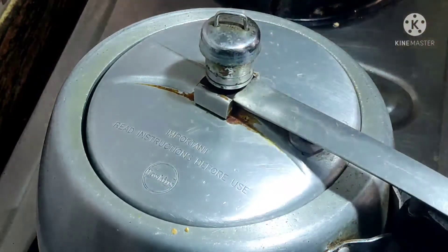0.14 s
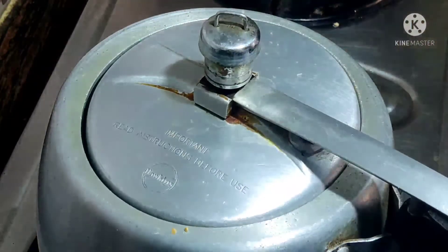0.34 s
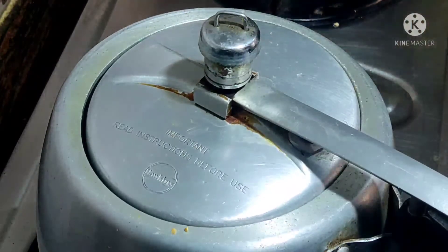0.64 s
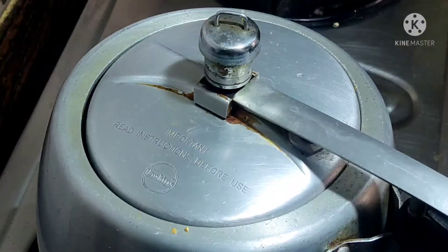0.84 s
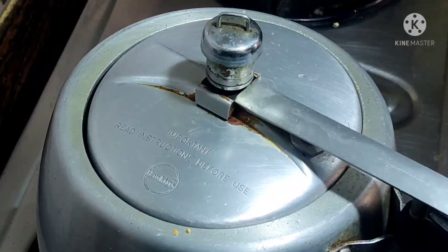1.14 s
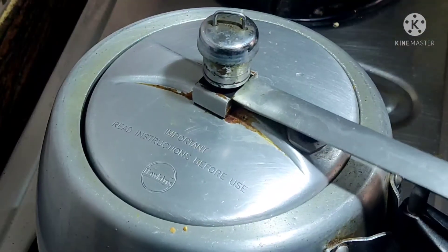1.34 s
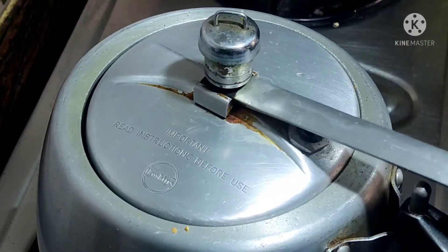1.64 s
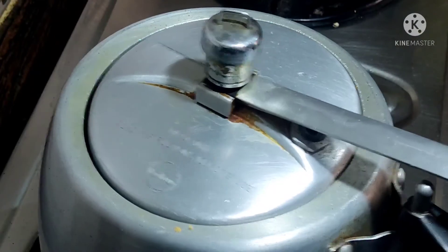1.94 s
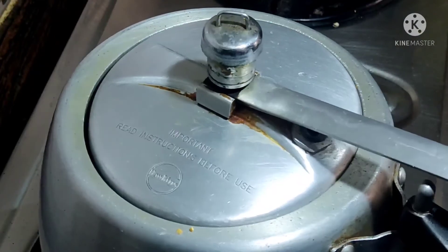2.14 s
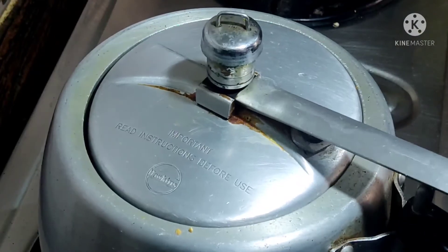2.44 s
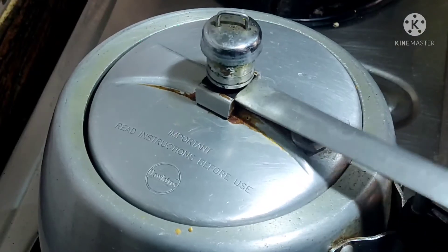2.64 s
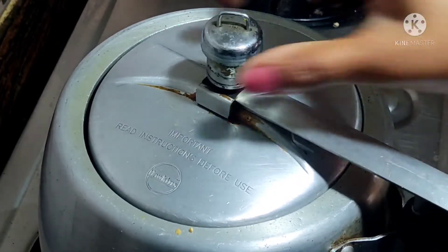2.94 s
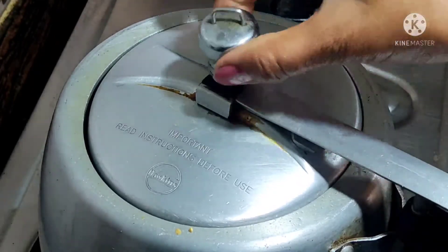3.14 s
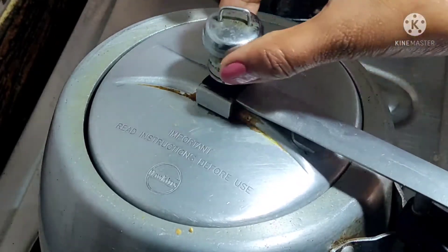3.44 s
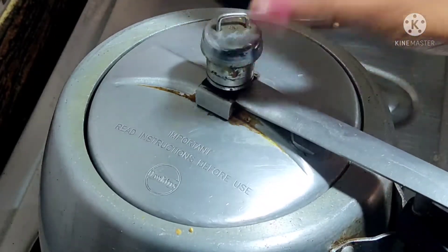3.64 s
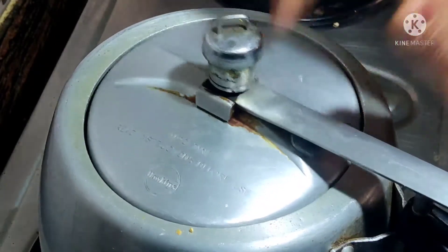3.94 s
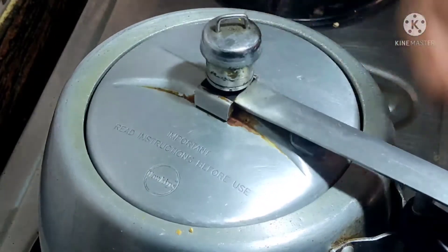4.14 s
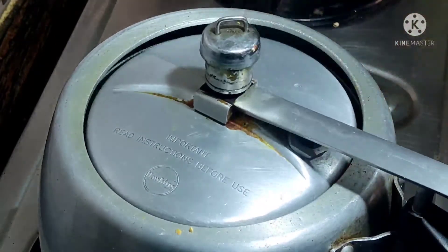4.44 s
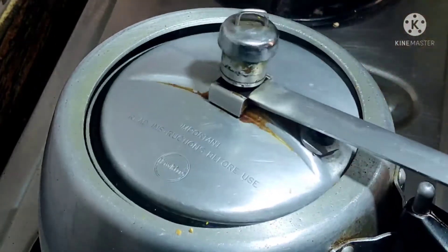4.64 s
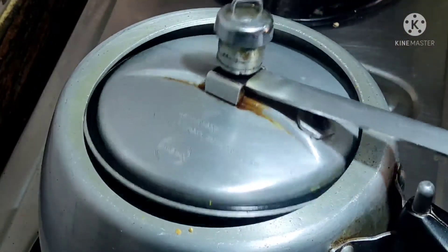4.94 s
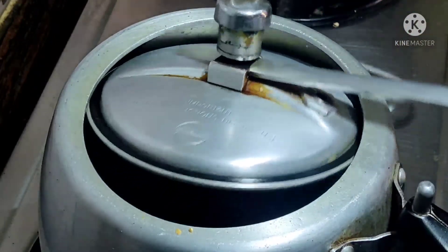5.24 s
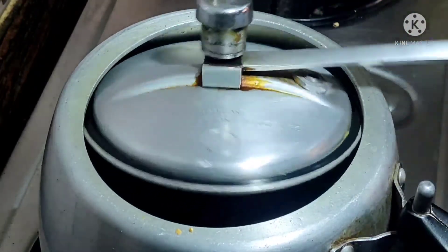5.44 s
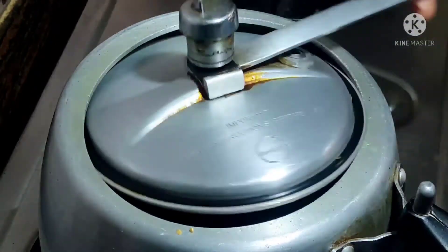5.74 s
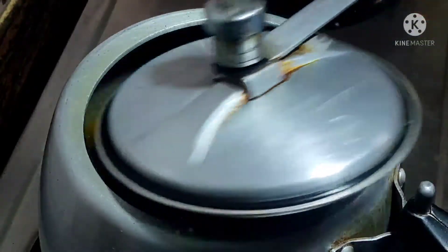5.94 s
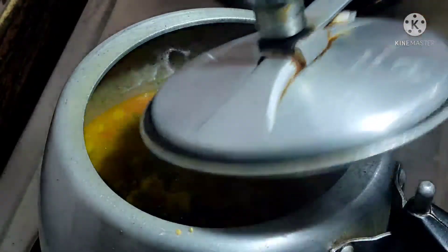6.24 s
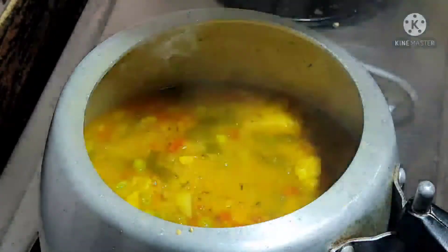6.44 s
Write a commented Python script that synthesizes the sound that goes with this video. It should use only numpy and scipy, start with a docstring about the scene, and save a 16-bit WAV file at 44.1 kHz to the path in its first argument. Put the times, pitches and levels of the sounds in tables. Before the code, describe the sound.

Close, wide stereo in a small reverberant kitchen, with soft low background and faint unsteady hum. From 0.3 to 1.0 s, aluminium cooker handles give irregular knocks, some clicky, some dull, with a faint creak. A wet plip and very faint seep of steam come near 1.2 s; quicker knocks with a high wire ping follow from 1.35 to 1.65 s, then heavier ones near 2.0. At 2.06-2.18 the catch springs off in a hard rapid clatter with bright pings. Sparse knocks follow; the valve weight ticks sharply at 2.72-2.78. At 3.13 it rattles lightly with a plip and a spitting hiss, gone by about 3.35. Bright, tight lid jolts come at 3.66 and, heavier, 3.97. At 4.67 the lid clangs hard on the rim, judders around 5.0, then scrapes hollowly, with knocks near 5.55 and 5.8, fading after 6.0. Faint last taps at 6.2 and 6.5.

```python
"""The handles of an aluminium pressure cooker knock and creak close by until their wire catch springs off.
The lifted valve weight rattles, hissing and spitting a last puff; as it drops back the lid jolts in its seat.
The lid strikes the rim, scrapes along it and is drawn out; wet plips, pot and kitchen lie behind.
Blows are dense noise crashes, ringing modes and a room tail; rubbing and steam are coloured noise."""
import sys
import numpy as np
from scipy import signal
from scipy.fft import rfft, irfft, next_fast_len
from scipy.io import wavfile
from scipy.ndimage import uniform_filter1d, map_coordinates

SR = 44100
rng = np.random.default_rng(int(sys.argv[2]) if len(sys.argv) > 2 else 0)


def inscribe(sig):
    """Save sig as 16-bit PCM at rate SR to the path in sys.argv[1].

    A 1-D sig is mono; a 2-D sig holds one channel per row.
    Samples are clipped to [-1, 1] before scaling.
    """
    pcm = np.round(np.clip(np.atleast_2d(sig).T, -1, 1) * 32767)
    wavfile.write(sys.argv[1], SR, pcm.astype(np.int16))


N = 290707
TOP_HZ = 15900
RING_TIME = np.arange(SR * 2 // 3) / SR  # seconds

# Levels in the tables are relative: each layer adds its own trim.
# Handles and wire catch knocking: start_s, tick_db (treble), thud_db
HANDLE_KNOCKS = [(0.0014, -34, -39), (0.322, -77, -29.5), (0.4174, -17, -26), (0.5322, -28, -34),
                 (0.5916, -23.5, -32), (0.6813, -82, -37.5), (0.8147, -27.5, -52), (1.0234, -34.5, -49.5),
                 (1.3518, -18, -30), (1.412, -15, -29.5), (1.4645, -30, -30), (1.5214, -24.5, -30.5),
                 (1.5784, -23, -24), (1.6353, -18, -29), (1.8194, -30, -30), (1.903, -44.5, -24),
                 (1.943, -29, -37.5), (2.0248, -26, -19.5), (2.5185, -27.5, -29.5), (2.9093, -17, -36.5),
                 (2.9922, -30, -36.5), (4.204, -25.5, -40), (4.264, -37.5, -40), (6.211, -45.5, -57),
                 (6.497, -45, -49.5)]
# Strongest modes of the handles: pitch_hz, level_db, t60_s
HANDLE_MODES = [(230.4, -11.5, 0.81), (267.3, -2, 0.26), (380, -0.5, 0.31), (489, -13, 0.48),
                (562, -10.5, 0.31), (714, -5.5, 0.35), (779, -15.5, 0.41), (848, -6.5, 0.32),
                (1136, -14.5, .25), (1475, -14, .29), (2400, -16.5, .35), (2630, -10, 0.18),
                (3490, -11.5, 0.15), (4430, -8.5, 0.098), (5250, -10, 0.14), (6070, -21.5, .29),
                (7260, -9, .2), (7290, -12, 0.18), (8700, -14.5, 0.12)]
# Dense wash of their weaker modes: freq_hz, density_db (per Hz)
HANDLE_WASH = [(40, -38.5), (120, -16.5), (190, -15.5), (250, -1.5), (370, -1.5), (480, -10.5), (850, -8.5),
               (1200, -13.5), (2700, -18.5), (3150, -21.5), (3450, -17), (3750, -26.5), (4300, -20.5),
               (5250, -20.5), (5700, -20), (6400, -22), (7000, -21), (7500, -15.5), (9300, -28),
               (12000, -39.5), (15500, -42.5)]


def handles():
    """Knocks excite the handles' modes, the heavier ones duller and slower."""
    blows = registers(HANDLE_KNOCKS, body_share=0.091, clang_share=0.53, body_db=-8.5, clang_db=-9.5)
    return contacts(blows, HANDLE_MODES, HANDLE_WASH, crack_t60_s=0.089, attack_s=0.00084,
                    ring_db=-8, tail_db=-6.5, treble_db=-13.5, level_db=-4.5, ripple_db=3.0,
                    dwell=0.3, bounce=0.17, tint_db=4.5)


# The hand squeezes and the handles rub on each other: start_s, end_s, level_db
SQUEEZES = [(0.322, 0.5, -45.5), (1.286, 1.67, -44), (1.946, 2.027, -37.5), (2.446, 2.617, -44),
            (2.855, 3.025, -45)]


def grip(rough_db=4, width_hz=30, ring_db=6, attack_s=0.0044, release_db_per_s=130):
    """The squeezed handles creep over each other in tiny slips that keep their modes sounding."""
    force = sum(outflow(start, db, attack_s, end - start, 0, release_db_per_s)
                for start, end, db in SQUEEZES)
    roughness = amp(rough_db * wobble(90))
    slips = stereo(rng.standard_normal((2, N)) * roughness, HANDLE_WASH)
    peaks = [(hz, width_hz, db / 2) for hz, db, _ in HANDLE_MODES]
    creak = filtered(slips, lambda f: 1 + amp(ring_db) * np.abs(resonances(peaks, f)))
    return force * unit(creak)


# The catch springs off, clatters against the handle and settles: start_s, tick_db, thud_db, body_db
CATCH_BLOWS = [(2.0557, -11.5, -13, -21.5), (2.072, -8, -13, -16.5), (2.083, -14.5, -11, -16.5),
               (2.0925, -16, -31.5, -16.5), (2.109, -11, -13.5, -14.5), (2.123, -13, -25.5, -19),
               (2.135, -9.5, -25.5, -24.5), (2.148, -19, -25.5, -28), (2.176, -27.5, -31.5, -36.5),
               (2.577, -34.5, -50, -32)]


def catch():
    """Short, hard blows on the handle, each with its own body."""
    blows = registers(CATCH_BLOWS, body_share=0, clang_share=0.87, body_db=0, clang_db=-8.0)
    blows[:, 3] = np.array(CATCH_BLOWS)[:, 3]
    return contacts(blows, HANDLE_MODES, HANDLE_WASH, crack_t60_s=0.082, attack_s=0.00094,
                    ring_db=-8, tail_db=-11.5, treble_db=-9.5, level_db=-7.5, ripple_db=5.0,
                    dwell=0.23, bounce=0.03, tint_db=5.5)


# The wire of the catch pinging: start_s, level_db, pitch_hz, width_hz (of each of four stacked resonances)
WIRE_PINGS = [(0.344, -41, 8800, 1000), (0.373, -36, 7400, 700), (0.5945, -19.5, 7300, 400),
              (1.412, -7.5, 8010, 2660), (2.0975, -6, 7360, 350), (2.1214, -5, 7300, 353),
              (2.129, -4, 7520, 650)]


def wire(t60_s=0.07, attack_s=0.0008, tail_db=-23, tail_t60_s=0.28, level_db=-5):
    """The springy wire pings high and briefly, at a pitch set by where it is touched."""
    t, track = RING_TIME, np.zeros((2, N))
    decay = amp(-60 * t / t60_s) + amp(tail_db - 60 * t / tail_t60_s)
    envelope = decay * (1 - np.exp(-t / attack_s))
    for s, db, hz, width in WIRE_PINGS:
        noise = rng.standard_normal((2, len(t)))
        cluster = filtered(noise, lambda f: resonances([(hz, width, 0)], f) ** 4)
        ping = cluster * envelope
        add(track, s, amp(db + level_db) * ping / np.abs(ping).max())
    return track


# The valve weight fingered, then rattling on its vent: start_s, tick_db, thud_db
WEIGHT_RATTLES = [(2.7215, -18, -46), (2.7392, -8.5, -48), (2.758, 2.5, -50.5), (2.7667, 1.5, -33),
                  (2.7792, -24, -28), (3.1325, -24, -42), (3.169, -17, -33), (3.187, -21, -42),
                  (3.229, -23.5, -51.5)]
# Strongest modes of the weight: pitch_hz, level_db, t60_s
WEIGHT_MODES = [(274.7, 0.5, 0.2), (1098, 11.5, 0.17), (1960, 2, 0.153), (6580, -10.5, 0.21),
                (7650, 1, 0.12), (7500, -3.5, .16), (8650, -6, .23)]
# Dense wash of its weaker modes: freq_hz, density_db (per Hz)
WEIGHT_WASH = [(40, -36), (180, -10), (260, 0), (550, -8.5), (1000, -0.5), (1400, -8), (3600, -10.5),
               (4700, -9.5), (6500, -7), (7900, 2.5), (9500, -11), (12500, -25), (15000, -28)]


def valve_weight():
    """Small, bright metal contacts with little ringing, whose bass swells late."""
    blows = registers(WEIGHT_RATTLES, body_share=0.46, clang_share=0.59, body_db=-7.0, clang_db=-8)
    return contacts(blows, WEIGHT_MODES, WEIGHT_WASH, crack_t60_s=0.049, attack_s=0.00051,
                    ring_db=-26.5, tail_db=-16.5, treble_db=-15.0, level_db=-6.0, ripple_db=9.0,
                    dwell=0.077, bounce=0.082, bass_lag_s=0.018)


# Steam under the lifted weight, then past the gasket:
# start_s, level_db, attack_s, hold_s, sag_db_per_s, release_db_per_s
WEIGHT_PUFF = (3.131, -24, 0.03, 0.125, 87, 165)
GASKET_SEEP = (1.16, -45.5, 0.13, 0.03, 30, 90)
# Water spat out as the vent opens: start_s, level_db, t60_s, pitch_ratio
WATER_SPITS = [(3.1324, -23, 0.15, 1.25), (3.165, -24.5, 0.17, 0.87)]
# Colour of the spits before the pitch ratio shifts it: freq_hz, density_db (per Hz)
SPIT_COLOUR = [(60, -30), (250, -11), (550, 3.5), (780, 3), (1080, 6), (1500, -1), (2200, -7), (3500, -4.5),
               (6000, -12), (9000, -42), (15000, -49)]


def steam(sputter_db=-1.0, spit_attack_s=0.00039, patchy_db=1.0):
    """The last pressure seeps past the gasket, then spits and hisses out under the lifted weight."""
    # freq_hz, density_db (per Hz)
    jet = [(150, -27), (600, -4), (1000, -8), (2000, -17), (4000, -12), (6500, -12), (7300, 0),
           (9000, -1), (10000, -18), (15000, -25)]
    flow = outflow(*WEIGHT_PUFF) + outflow(*GASKET_SEEP)
    sound = flow * stereo(patchy(rng.standard_normal((2, N)), patchy_db), jet)
    for s, db, t60, ratio in WATER_SPITS:
        burst = outflow(s, db, spit_attack_s, 0, 0, 60 / t60)
        colour = np.array(SPIT_COLOUR) * [ratio, 1]
        sound += burst * stereo(patchy(rng.standard_normal((2, N)), patchy_db), colour)
    return amp(sputter_db * wobble(120)) * sound


# The lid jolting in its seat as the weight drops back and the seal lets go: start_s, tick_db, thud_db
SEAT_JOLTS = [(3.658, -11.5, -41.5), (3.673, -1.5, -29), (3.687, -28, -30), (3.967, -15, -14),
              (3.985, -5, -20.5), (3.996, -1.5, -27)]
# Strongest modes of the jolted lid: pitch_hz, level_db, t60_s
JOLT_MODES = [(123, -6.5, 0.73), (163.2, 3.5, 0.27), (341, -4, 0.48), (1071, -4.5, 0.14),
              (2468, -14.5, 0.39), (3193, -4, 0.17), (3800, -6.5, 0.18), (4160, -10, 0.27),
              (5770, -1.5, 0.18), (8400, -8.5, 0.17), (8543, -1, 0.16), (9360, -15, 0.35),
              (10900, -19.5, 0.16)]
# Dense wash of its weaker modes: freq_hz, density_db (per Hz)
JOLT_WASH = [(40, -29), (85, -3.5), (145, 5.5), (205, 1), (320, 2), (480, -10.5), (1000, -12.5),
             (1500, -19.5), (2600, -13.5), (3700, -3.5), (4500, -12.5), (6500, -9), (7900, -2.5),
             (9500, -15), (11500, -19.5), (12700, -39), (14800, -26)]


def lid_jolts():
    """The jolting lid speaks through its own set of low and high modes."""
    blows = registers(SEAT_JOLTS, body_share=0.8, clang_share=1.0, body_db=-19.0, clang_db=-17.5)
    return contacts(blows, JOLT_MODES, JOLT_WASH, crack_t60_s=0.073, attack_s=0.00085,
                    ring_db=-15.5, tail_db=-14.5, treble_db=-13.5, level_db=-6, ripple_db=3.0,
                    dwell=0.055, bounce=0.075)


# The lid hitting the rim and juddering through the opening:
# start_s, tick_db, thud_db, extra_clang_db (of a clean strike)
LID_STRIKES = [(4.6651, -5, -34, 13.5), (4.6739, -7, -26, -5.5), (4.6983, -5.5, -30.5, -4),
               (4.822, -20.5, -48.5, 3), (4.9133, -26.5, -36.5, -0.5), (4.9881, -16, -27, -3.5),
               (4.9982, -12.5, -30, 2), (5.0118, -20, -28.5, 3), (5.031, -22, -27.5, 10.5),
               (5.0554, -18.5, -25.5, -2.5), (5.064, -10, -36, -3.5), (5.0724, -31.5, -28, 12.5),
               (5.241, -35, -33, 2.5), (5.2856, -41, -41, 9.5), (5.3168, -31, -33, 7.5),
               (5.3853, -30, -53.5, 9.5), (5.4124, -30.5, -34.5, 7), (5.5486, -25.5, -35, 6.5),
               (5.7724, -17, -31.5, 10.5), (5.811, -27.5, -28.5, -16)]
# Strongest modes of the lid: pitch_hz, level_db, t60_s
LID_MODES = [(315.4, 2, .2), (394, -0.5, 0.34), (462, -3, 0.29), (886, 5.5, 0.25), (1103, -3, 0.3),
             (1460, -1, .25), (2440, -8, 0.29), (2664, 3, 0.19), (2705, -0.5, .3), (2940, -23, .23),
             (3580, -21, .25), (4020, -12.5, .3), (4360, -10.5, 0.32), (4630, -10.5, 0.16),
             (5835, -19, 0.19), (6600, -10, 0.23), (7432, 1, 0.16), (7580, 7, 0.11), (8995, -6, 0.21)]
# Dense wash of its weaker modes: freq_hz, density_db (per Hz)
LID_WASH = [(40, -36.5), (120, -36), (170, -9), (320, 8.5), (600, -4.5), (1100, -2.5), (1750, -7.5),
            (2650, -1), (3150, -11.5), (3600, -5.5), (5300, -9), (7700, -0.5), (9000, -5), (10200, -26),
            (12500, -26.5), (15500, -43.5)]


def lid_blows():
    """Strikes on the rim clang more the cleaner they land."""
    strikes = registers(LID_STRIKES, body_share=0.29, clang_share=0.72, body_db=-2.5, clang_db=-9.5)
    strikes[:, -1] += np.array(LID_STRIKES)[:, -1]
    return contacts(strikes, LID_MODES, LID_WASH, crack_t60_s=0.13, attack_s=0.001,
                    ring_db=-8.0, tail_db=-11, treble_db=-12.5, level_db=-5.5, ripple_db=6.5,
                    dwell=0.11, bounce=0.39)


# Pressure of the lid sliding on the rim: time_s, level_db
SLIDE_PRESSURE = [(4.781, -41.5), (4.95, -44.5), (5.071, -35), (5.21, -41), (5.25, -42.5), (5.38, -35.5),
                  (5.42, -33.5), (5.535, -35.5), (5.58, -31.5), (5.75, -39.5), (5.81, -36.5), (5.96, -39),
                  (6.03, -51.5), (6.28, -66.5)]
# Resonances of the rubbed rim: pitch_hz, width_hz, level_db (halved in use)
RIM_RESONANCES = [(238, 14, 0), (315, 16, -6.5), (383.6, 15, -0.5), (465, 12.3, 11), (546, 14.5, 4.5),
                  (624, 11.4, 14), (876, 16, 11.5), (986, 12, -15.5), (1114, 75, 8), (1455, 52, 9),
                  (1677, 35, -4.5), (2020, 27, 5.5), (2374, 25, 4), (2688, 170, -2), (4340, 54, -4),
                  (7470, 64, -14)]
# Colour of the rubbing itself: freq_hz, density_db (per Hz)
RUB_COLOUR = [(59, -58), (100, -55), (162, 3), (319, 1.5), (640, -13), (682, -6), (879, -6.5), (1880, -21),
              (2630, -17.5), (5400, -24.5), (7560, -15.5), (9950, -31), (15500, -70)]


def scrape(rough_db=2.0, rim_db=3, grit_db=-3.0, split_hz=1500, wander_db=4, rub_db=-1.0):
    """The lid's edge sticks and slips along the rim; the contact favours now one resonance, now another."""
    pressure = gains(SLIDE_PRESSURE)[0]
    roughness = amp(rough_db * wobble(140))
    slips = patchy(rng.standard_normal((2, N)) * roughness, wander_db)
    peaks = [(hz, width, db / 2) for hz, width, db in RIM_RESONANCES]
    rim = filtered(stereo(slips, RUB_COLOUR), lambda f: 1 + amp(rim_db) * np.abs(resonances(peaks, f)))
    low = filtered(rim, lambda f: 1 / (1 + (f / split_hz) ** 4))
    grit = unit(rim - low)
    rub = unit(unit(low) + amp(grit_db) * grit)
    return amp(rub_db) * pressure * rub + snags(pressure)


def snags(pressure, count=110, level_db=-2, scatter_db=2, shift_db=6, sustain=0.99,
          click_db=-14, click_t60_s=0.03, dull_hz=3400):
    """Burrs on the sliding edge catch and let go; each sets off its own mix of the rim's resonances."""
    t, track = RING_TIME[:SR // 5], np.zeros((2, N))
    hz, width, db = np.transpose(RIM_RESONANCES)
    rings = amp(db[:, None] / 2) * np.exp((2j * np.pi * hz - np.pi * width / sustain)[:, None] * t)
    ears = np.exp(1j * np.array([spread(hz), -spread(hz)]))
    start, end = SLIDE_PRESSURE[0][0], SLIDE_PRESSURE[-1][0]
    # One snag at a random moment in each equal slot of the slide.
    times = start + (end - start) * (np.arange(count) + rng.random(count)) / count
    for s in times:
        phases = np.exp(2j * np.pi * rng.random(len(hz)))
        shares = amp(shift_db * rng.standard_normal(len(hz))) * phases
        ring = ((ears * shares) @ rings).real / np.linalg.norm(shares)
        click = amp(click_db - 60 * t / click_t60_s) * rng.standard_normal((2, len(t)))
        strength = pressure[int(s * SR)] * amp(level_db + scatter_db * rng.standard_normal())
        add(track, s, strength * (ring + click))
    return filtered(track, lambda f: 1 / (1 + (f / dull_hz) ** 4))


# Small wet plips: start_s, level_db, pitch_hz (at the start of the rise)
WET_PLIPS = [(0.961, -35, 1770), (0.972, -39, 1740), (1.22, -12, 1336), (3.132, -18, 1030),
             (4.392, -40, 1470), (4.434, -41.5, 1350)]


def plips(t60_s=0.018, tail_db=-19.5, level_db=-0.5, width_hz=600, rise=0.09):
    """A drop rings for a few cycles, rising in pitch, and the room carries it on."""
    t, track = RING_TIME, np.zeros((2, N))
    for s, db, hz in WET_PLIPS:
        pitch = hz * (1 + rise * (1 - np.exp(-t / 0.04)))
        tone = np.sin(2 * np.pi * np.cumsum(pitch) / SR)
        drop = tone * amp(-60 * t / t60_s) * (1 - np.exp(-t / 0.00094)) ** 2
        noise = rng.standard_normal((2, len(t)))
        echo = unit(filtered(noise, lambda f: resonances([(pitch[-1], width_hz, 0)], f) ** 3))
        tail = amp(tail_db - 60 * t / 0.3) * echo
        add(track, s, amp(db + level_db) * (drop + tail))
    return track


# Kitchen background colour: freq_hz, density_db (per Hz)
KITCHEN_COLOUR = [(12, -35.5), (20, -7.5), (35, -6.5), (59, -21), (74, -12), (92, -27), (119, -17.5),
                  (161, -16), (362, -25.5), (614, -23), (725, -30), (1230, -31), (5380, -41), (9130, -36.5),
                  (15500, -79)]
# An appliance's hum: pitch_hz, level_db (mean of a wandering level)
APPLIANCE_HUM = [(97, -62), (160, -63.5), (248, -64.5)]
# Air ringing in the open pot: time_s, level_db
POT_HOLLOW = [(6.15, -84.5), (6.4, -70), (6.48, -59.5), (6.59, -60)]


def kitchen(floor_db=-57):
    """Soft background, an unsteady hum and the hollow note of the uncovered pot."""
    t = np.arange(N) / SR
    air = amp(floor_db + 0.85 * wobble(9.1)) * stereo(rng.standard_normal((2, N)), KITCHEN_COLOUR)
    hum = 0
    for hz, db in APPLIANCE_HUM:
        level = amp(db + 3 * wobble(7)) * np.sqrt(2)
        hum = hum + level * np.sin(2 * np.pi * hz * t + wobble(8))
    noise = rng.standard_normal((2, N))
    pot = unit(filtered(noise, lambda f: resonances([(638, 30, 0)], f) ** 2))
    return air + hum + gains(POT_HOLLOW)[0] * pot


def registers(rows, body_share, clang_share, body_db, clang_db):
    """Body and clang lie between thud and tick; gives rows of start_s, tick, thud, body, clang in dB."""
    s, tick, thud = np.transpose(rows)[:3]
    brightness = tick - thud
    body = thud + body_share * brightness + body_db
    clang = thud + clang_share * brightness + clang_db
    return np.column_stack([s, tick, thud, body, clang])


def contacts(rows, modes, wash, crack_t60_s, attack_s, ring_db, tail_db, treble_db, level_db,
             ripple_db, dwell, bounce, tint_db=1.0, bass_lag_s=0):
    """Each contact is a short crash of dense modes, a few ringing ones and the room's tail."""
    t, track = RING_TIME, np.zeros((2, N))
    hz, mode_db, t60 = np.transpose(modes)
    decays = amp(mode_db[:, None] - 60 * t / t60[:, None])
    rings = decays * np.exp(2j * np.pi * hz[:, None] * t)
    ears = np.exp(1j * np.array([spread(hz), -spread(hz)]))
    # The weaker modes cluster into ridges and gaps that stay the same from blow to blow.
    grid = np.arange(1500, TOP_HZ, 110)
    ridges_db = ripple_db * np.clip(rng.standard_normal(len(grid)), -2, 1)

    def dense(tint):
        """Noise in the colour of the crowded modes, tinted by the point of contact."""
        noise = stereo(rng.standard_normal((2, len(t))), wash)
        return unit(filtered(noise, lambda f: amp(np.interp(f, grid, ridges_db, left=0) + along(tint, f))))

    spots = np.geomspace(250, 6000, 30)  # Hz
    cleanest_db = max(row[-1] for row in rows)
    for s, tick_db, thud_db, body_db, clang_db in rows:
        # Each point of contact favours its own share of the modes.
        spot_db = tint_db * rng.standard_normal(len(spots)) * (spots < spots[-1])
        tint = np.column_stack([spots, spot_db])
        # A bright tick is over at once; a dull, heavy knock builds slowly and dwells.
        softness = np.clip(amp(dwell * (thud_db - tick_db + 7.5)), .4, 2)
        phases = np.exp(2j * np.pi * rng.random(len(hz)))
        shares = amp(1.54 * rng.standard_normal(len(hz))) * phases
        # A hard blow bounces clear and rings freely; a light one stays in touch and is damped.
        freedom = amp(bounce * (clang_db - cleanest_db))
        ring = freedom * ((ears * shares) @ rings).real
        crash = dense(tint) * amp(-60 * t / (crack_t60_s * softness)) / np.sqrt(softness)
        tail = die_away(dense(tint))
        onset = 1 - np.exp(-t / (attack_s * softness ** 2))
        blow = (crash + amp(ring_db) * ring + amp(tail_db) * tail) * onset
        add(track, s, voiced(blow, [thud_db, body_db, clang_db, tick_db + treble_db]))
    # The pot is too small to radiate the deepest bass.
    track = signal.sosfilt(signal.butter(2, 58, "highpass", fs=SR, output="sos"), track)
    # Low bending waves travel more slowly, so with a lag the bass swells after the click.
    lagged = filtered(track, lambda f: np.exp(-2j * np.pi * bass_lag_s * 600 * np.arctan(f / 600)))
    return amp(level_db) * lagged


# Registers of thud, body, clang and tick: low_hz, high_hz
REGISTER_BANDS = [(100, 500), (550, 1800), (1800, 5500), (5500, 14000)]


def voiced(blow, levels_db):
    """Place and hardness of a contact set how strongly each register speaks at first."""
    onset = blow.mean(axis=0)[:SR // 50] * signal.windows.tukey(SR // 50, .1)
    power = 2 * np.abs(rfft(onset) / len(onset)) ** 2
    f = np.fft.rfftfreq(len(onset), 1 / SR)
    lift = []
    for (lo, hi), db in zip(REGISTER_BANDS, levels_db):
        present_db = 10 * np.log10(power[(f >= lo) & (f < hi)].sum())
        lift.append((np.sqrt(lo * hi), db - present_db))
    return filtered(blow, lambda hz: amp(along(lift, hz)))


# Reverberation of the kitchen: freq_hz, t60_s
ROOM_DECAY = [(100, 0.77), (300, 0.51), (1000, 0.56), (4000, 0.45), (8000, 0.38), (15000, 0.22)]


def die_away(x):
    """Each frequency fades at the kitchen's own speed."""
    hz, t, z = signal.stft(x, SR, nperseg=256)
    fade = amp(-60 * t / along(ROOM_DECAY, hz)[:, None])
    return signal.istft(z * fade, SR, nperseg=256)[1][:, :x.shape[1]]


def outflow(start, level_db, attack_s, hold_s, sag_db_per_s, release_db_per_s):
    """An envelope opens like a leak, sags with the falling pressure and dies away."""
    t = np.arange(N) / SR - start
    sag_db = sag_db_per_s * np.clip(t - attack_s, 0, hold_s)
    release_db = release_db_per_s * np.maximum(t - attack_s - hold_s, 0)
    return np.clip(t / attack_s, 0, 1) * amp(level_db - sag_db - release_db)


def patchy(pair, depth_db):
    """Narrow bands swell and fade, each by itself."""
    z = signal.stft(pair, nperseg=1024)[2]
    favour = uniform_filter1d(rng.standard_normal(z.shape[1:]), size=3, axis=0)
    favour = unit(uniform_filter1d(favour, size=8, axis=1))
    return signal.istft(z * amp(depth_db * favour), nperseg=1024)[1][:, :N]


def resonances(peaks, hz):
    """Response of resonances given as centre_hz, width_hz, level_db, with alternating sign."""
    total = 0
    for k, (centre, width, db) in enumerate(peaks):
        damping = 1j * hz * width
        total = total + (-1) ** k * amp(db) * damping / (centre * centre - hz * hz + damping)
    return total


# Left-right likeness: freq_hz, correlation (1 is identical)
EAR_LIKENESS = [(60, 0.36), (130, 0.9), (290, 0.76), (640, 0.38), (1410, -0.064), (3100, 0.13),
                (6820, -0.053), (15000, -0.11)]


def spread(hz):
    """Half the phase angle between the two ears of the microphone."""
    return np.arccos(np.clip(along(EAR_LIKENESS, hz), -1, 1)) / 2


def stereo(pair, spectrum):
    """Two unrelated signals become a coloured left and right, as alike as the likeness table says."""
    def colour(hz):
        return amp(along(spectrum, hz)) * np.array([np.cos(spread(hz)), np.sin(spread(hz))])

    mid, side = filtered(pair, colour)
    return unit(np.array([mid + side, mid - side]))


def filtered(x, response):
    """x times a response of frequency."""
    n = x.shape[-1]
    m = next_fast_len(n + 4096, True)
    return irfft(rfft(x, m) * response(np.fft.rfftfreq(m, 1 / SR)), m)[..., :n]


def wobble(rate):
    """A smooth random curve, rate knots a second."""
    knots = rng.standard_normal(int(N * rate / SR) + 4)
    return map_coordinates(knots, [np.arange(N) * rate / SR])


def gains(rows):
    """A gain per sample for each dB column, practically silent outside the rows."""
    s, *cols = np.transpose(rows)
    t = np.arange(N) / SR
    return [amp(np.interp(t, s, c, left=-120, right=-120)) for c in cols]


def along(points, hz):
    """Points of freq_hz and value, read on a log frequency axis."""
    f, v = np.transpose(points)
    return np.interp(np.log(hz + 1), np.log(f + 1), v)


def amp(db):
    """Decibels to gain."""
    return 10 ** (np.asarray(db) / 20)


def unit(x):
    """Scale to rms 1."""
    return x / np.sqrt(np.mean(x ** 2) + 1e-20)


def add(track, s, sound):
    """Mix a sound into the track at a time in seconds."""
    start = max(round(s * SR), 0)
    track[:, start:start + sound.shape[1]] += sound[:, :N - start]


# Balance of the cooker: freq_hz, left_minus_right_db
COOKER_LEAN = [(100, 5), (250, 1.5), (380, -1.5), (520, 4), (1000, 2), (1500, -0.5), (2600, -1.5),
               (5000, -3), (6600, -4), (7400, -13.5), (8400, 6.5), (10000, -0.5)]


def scene():
    """All parts of the cooker radiate unevenly to left and right, over the kitchen background."""
    cooker = handles() + grip() + catch() + wire()
    cooker += valve_weight() + steam()
    cooker += lid_jolts() + lid_blows() + scrape() + plips()

    def lean(hz):
        half_db = along(COOKER_LEAN, hz) / 2
        return amp(np.array([half_db, -half_db]))

    return filtered(cooker, lean) + kitchen()


def record(dry):
    """The recorder clips at full scale and keeps nothing above its band limit."""
    return filtered(np.clip(dry, -1, 1), lambda hz: np.clip((TOP_HZ - hz) / 600 + .5, 0, 1) ** 2)


dry = scene()
out = record(dry)
inscribe(out)
```